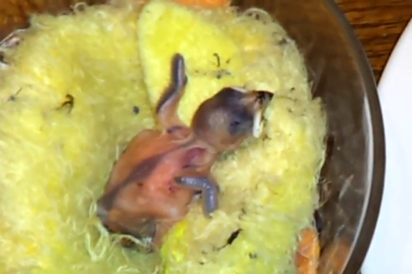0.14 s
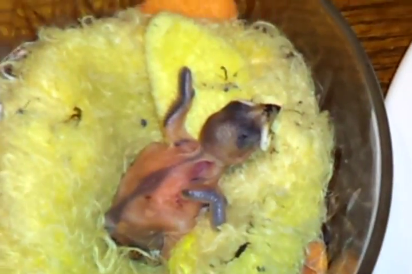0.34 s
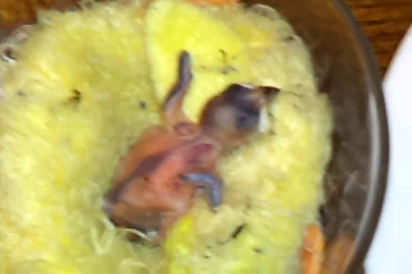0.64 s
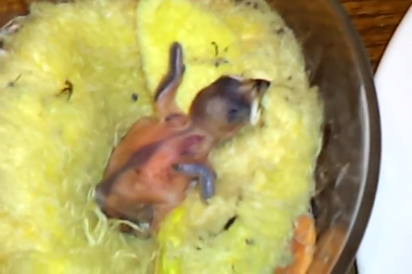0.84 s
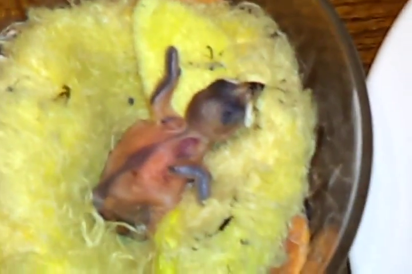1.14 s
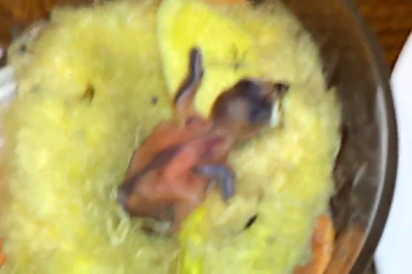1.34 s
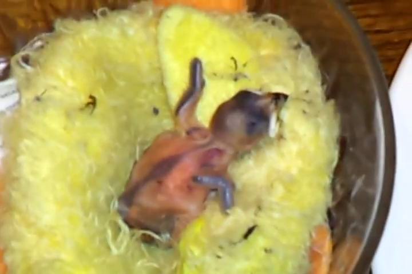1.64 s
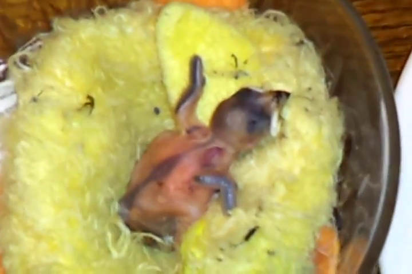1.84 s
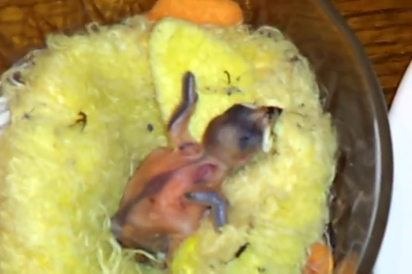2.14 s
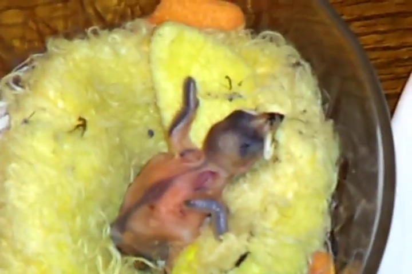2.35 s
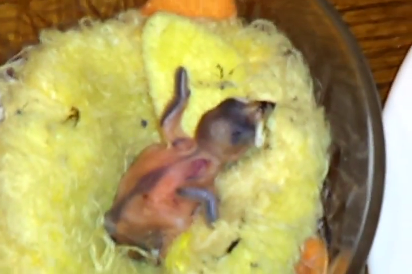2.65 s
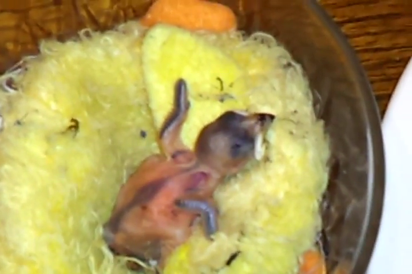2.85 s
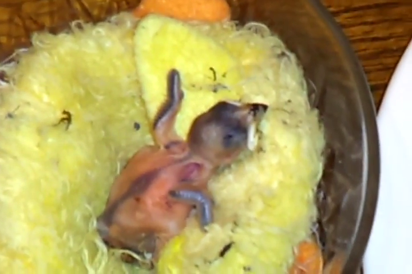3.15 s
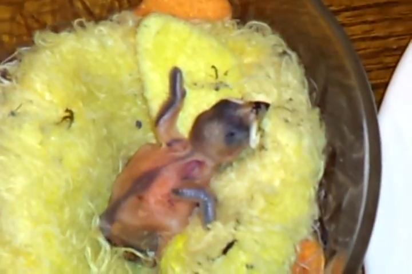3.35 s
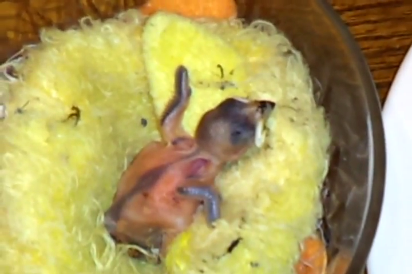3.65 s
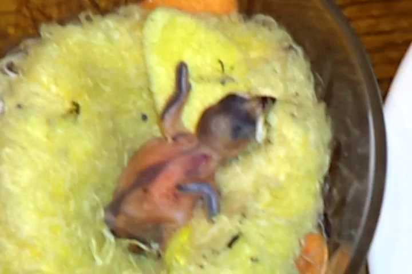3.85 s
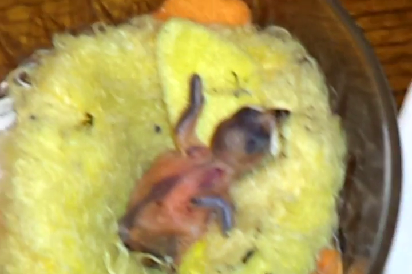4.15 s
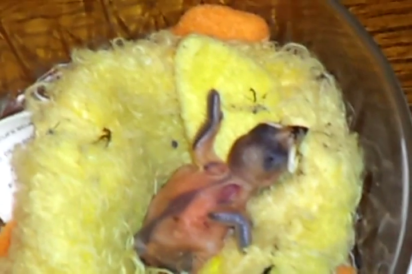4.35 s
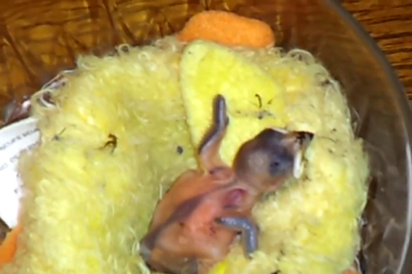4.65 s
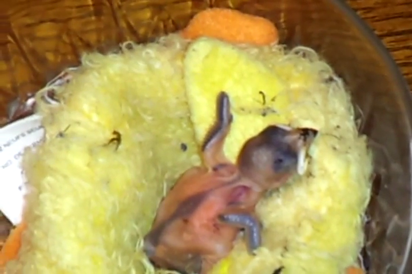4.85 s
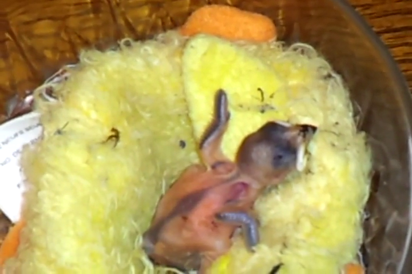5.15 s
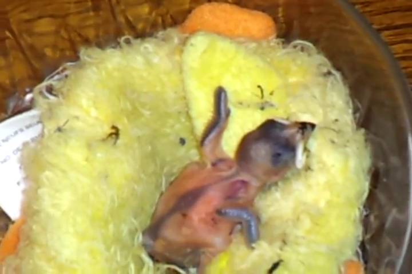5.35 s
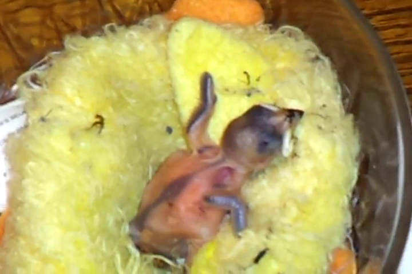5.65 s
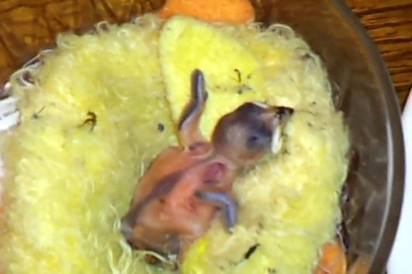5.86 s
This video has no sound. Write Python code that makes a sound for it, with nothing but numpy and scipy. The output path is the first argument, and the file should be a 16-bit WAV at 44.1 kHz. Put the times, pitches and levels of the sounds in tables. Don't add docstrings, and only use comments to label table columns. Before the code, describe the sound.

A quiet room with soft hiss, faint appliance hum and slight cloth brushing, heard through a close, narrow-band microphone. A faint scrape and paper crackle open; at 0.27 and 0.45 s a spoon strikes a ceramic dish very hard, overloading, with table knocks and a quick rebound. Tiny falling squeaks follow at 0.5-0.6 s. Dry ticks and a loud papery snap come at 1.0-1.3 s, then thin peeps around 1.35-1.5 and a muffled tap. A sharp tick marks 2.4 s; hoarse little squeaks sound at 2.65-2.8 among light scrapes and soft table knocks. From 2.9 to 3.75 s taps and scrapes crowd together, strongest at 3.3, 3.5 and 3.7. Squeaks return at 3.9, then it is mostly calm, with a faint tap at 4.4 and weak peeps at 5.0-5.3. A strong muffled blow lands at 5.53; scraping, clinks, rustle and a cup set down rattle at 5.8-6.0.

```python
import sys
import numpy as np
from scipy import signal
from scipy.fft import rfft, irfft, next_fast_len
from scipy.io import wavfile
from scipy.ndimage import uniform_filter1d

SR = 44100
rng = np.random.default_rng(int(sys.argv[2]) if len(sys.argv) > 2 else 0)


def how_loud(loudness_db):
    steps = np.asarray(loudness_db, float) / 20
    return 10 ** steps


def unload_wav(signal):
    wavfile.write(
        sys.argv[1],
        SR,
        np.round(np.clip(np.atleast_2d(signal).T, -1, 1) * 32767).astype(np.int16),
    )


N = 265085

# (frequency [Hz], level [dB], waver [Hz])
MOTOR_LINES = [(42, -43, .3), (112, -71.5, 1.3), (121.4, -48.5, 0.57), (243, -49.5, 7.34),
               (328.6, -52.5, 17), (98, -56.5, 7.63), (788, -59.5, 14)]
# (frequency [Hz], level [dB])
HISS_SPECTRUM = [(40, -41), (60, -14.5), (127, -6), (214, -10.5), (341, -10), (430, -11.5), (850, -16.5),
                 (1600, -18), (2960, -20.5), (4440, -14.5), (5600, -21.5), (6400, -36.5), (7400, -45),
                 (8200, -67.5)]
# (time [s], effort [dB])
CLOTH_EFFORT = [(0, -40.5), (.47, -45), (.7, -42), (1.34, -42.5), (2.3, -47), (3.15, -42), (3.62, -39),
                (3.85, -46), (5.6, -47), (5.84, -43), (6.01, -35)]
# (time [s], length [s], start level [dB], end level [dB], strength of the sheet's resonance [1])
RUSTLES = [
    (0, 0.044, -49, -37, 2),
    (0.086, 0.15, -56, -43.5, 1.6),
    (1.046, 0.024, -32, -44, 1.8),
    (1.2401, 0.018, -10, -5, 0.96),
    (2.493, 0.018, -40.5, -30, 3.5),
    (5.802, 0.12, -29, -33, 1.7),
    (5.918, 0.1, -39.5, -20, 2.8),
]
# (frequency [Hz], level [dB])
PAPER_RESONANCE = [(590, -47.5), (1000, -32), (1730, -31.5), (2800, -12), (4300, -3.5), (5350, -3),
                   (5870, -15), (6890, -10.5), (7500, -20), (9750, -57.5), (16500, -120)]
# (time [s], level [dB], centre [Hz])
DRY_TICKS = [(0.5993, -11, 4200), (0.9148, -24, 4830), (0.9482, -27, 3940), (0.982, -39, 4590),
             (1.075, -7.5, 4130), (1.311, -14, 4430), (1.3244, -26, 5000), (2.232, -18.5, 4170),
             (2.3917, -17, 4680), (2.399, -22, 5500), (2.4048, -0.5, 4340), (2.473, -20, 4840),
             (2.722, -19, 4380), (2.8989, -23, 3410), (3.3283, -14.5, 4270), (3.513, -20, 5040),
             (3.8645, -27, 5580), (4.996, -34, 5300), (5.7586, -36, 4780), (5.7776, -14, 4560),
             (1.075, -19.5, 6040)]
# (time [s], level [dB], centre [Hz], t60 [s])
DECAYING_TICKS = [
    (1.075, -21, 1800, 0.0054),
    (1.3115, -19.5, 2000, .006),
    (1.3112, -20, 2800, .005),
    (1.49, -23, 5900, .006),
    (5.836, -11, 1900, .012),
    (3.3283, -10, 2100, 0.019),
    (3.5124, -7.5, 2380, 0.012),
    (3.5124, -9, 4600, 0.02),
]
# (time [s], length [s], crest after start [s], crest [Hz], effort [dB])
LOW_VOICE = [
    (.503, .045, -.06, 7550, -29),
    (1.35, .15, .035, 6280, -35),
    (2.748, .052, -.003, 6100, -32),
    (3.912, .165, .08, 6190, -33),
    (4.995, .047, -.005, 6080, -35),
    (5.058, .032, 0, 5950, -35),
    (5.083, .093, .057, 5920, -37),
]
# (time [s], length [s], crest after start [s], crest [Hz], effort [dB])
HIGH_VOICE = [
    (.558, .047, -.08, 7150, -36),
    (1.372, .08, .003, 6800, -39),
    (2.65, .09, .055, 6830, -36),
    (2.782, .048, -.06, 7020, -36),
    (3.955, .045, .02, 6750, -40),
    (5.03, .036, .08, 6150, -31),
    (5.045, .112, .065, 6850, -42),
]
# (time [s], length [s], crest after start [s], crest [Hz], effort [dB])
TIRED_NOTES = [
    (.1, .15, .07, 4320, -53),
    (1.316, .066, .02, 6820, -33),
    (3.885, .036, .03, 6520, -35),
    (5.215, .085, .02, 5590, -40),
    (5.285, .04, 0, 5560, -45),
]
# (time [s], length [s], pitch [Hz], level [dB], roughness [0-1])
RASPS = [
    (2.637, .03, 6000, -43, .4),
    (2.673, .014, 6100, -42, .2),
    (2.693, .018, 5950, -35, .1),
    (3.863, .022, 5900, -37, .3),
    (3.864, .036, 5500, -38, .3),
    (3.92, .07, 6000, -47, .3),
    (4.995, .025, 6500, -50, .2),
    (5.06, .04, 5780, -47, .3),
]
# (frequency [Hz], level [dB], t60 [s])
TABLE_MODES = [(226.3, 0.5, 0.46), (330.4, -3, 0.28), (384, 3.5, .1), (553, -8.5, 0.061), (740, -9.5, 0.2),
               (777, -4, 0.032), (960, -5.5, 0.068), (1280, -22, 0.021), (1230, -19.5, 0.12)]
# (time [s], level [dB], hardness [dB])
KNOCKS = [(0.262, -23, 1.5), (0.448, -19, -10), (2.255, -22.5, -17), (2.789, -54, -15), (2.855, -17, -15),
          (3.044, -14.5, -16), (3.298, -25.5, -27), (3.395, -26.5, -9), (3.439, -23.5, -31),
          (5.886, -13.5, -3), (5.909, -18.5, -3)]
# (time [s], level [dB], frequency [Hz])
THUMPS = [
    (0.2661, -16.5, 111),
    (0.4455, -14, 93.6),
    (2.791, -25, 80.6),
    (5.526, -36, 114),
    (5.928, -17.5, 168),
]
# (frequency [Hz], level [dB], t60 [s])
CUP_MODES = [(824, 2, 0.086), (865, 1.5, 0.043), (1100, -11, 0.06), (1517, -5.5, 0.17), (2014, 8, 0.079),
             (2300, -1, 0.041), (2645, 9, 0.058), (3190, -8.5, 0.09), (3580, -8, 0.29), (5002, 2, 0.088)]
# (frequency [Hz], ..)
DISH_HZ = [
    [1493, 1546, 1262, 1640],
    [2476, 2572, 2622, 2972],
    [4030, 4085, 3946, 4506],
    [5206, 5308, 5385, 5620],
    [4870, 6050, 6130, 6958, 7220],
]
# (level [dB], t60 [s])
DISH_RING = [
    [(1, 0.29), (3.5, 0.15), (-17.5, 0.13), (-24.5, 0.029)],
    [(-20, 0.4), (2.5, 0.099), (-14, 0.33), (-3.5, 0.021)],
    [(-14, 0.43), (7, 0.16), (-4.5, 0.03), (-19.5, 0.1)],
    [(-12, 0.05), (3, 0.12), (-3, 0.14), (-18.5, 0.063)],
    [(-15, .06), (0, 0.083), (-13, 0.25), (-8, 0.11), (-6.5, 0.078)],
]
NODE_ORDERS = [2, 3, 4, 5]
# (time [s], length [s], pressure [dB], hardness [dB per octave], place [degrees])
DRAGS = [(0, 0.096, -46.5, -10.5, 30), (.87, 0.16, -50, -10, 28), (1.46, 0.035, -41, 1, 87),
         (2.145, 0.26, -51, -2, 75), (2.585, 0.12, -44, -8, 36), (2.805, 0.1, -44.5, -5, 6.2),
         (2.919, 0.081, -37, -8.5, 32), (3.027, 0.057, -33, 1.5, 82), (3.119, 0.14, -39, 0.5, 85.7),
         (3.41, 0.12, -32.5, -5, 25.4), (5.804, 0.084, -30, 0, 82.5)]
# (time [s], blow [dB], hardness [dB per octave], place round the rim [degrees])
FREE_BLOWS = [
    (0.2658, 0, 1.5, 13.9),
    (0.4493, -1, 3, 85.6),
    (0.4604, -0.5, -7.5, 38.7),
    (0.4894, -17.5, 1, 50),
]
# (time [s], blow [dB], hardness [dB per
HELD_BLOWS = [(0.8812, -29, -4, 85.5), (1.7551, -21.5, 1.5, 20), (2.3275, -26.5, -1, 64.5),
              (2.3499, -27, -1.5, 75), (2.5006, -24, 1, 38), (2.6998, -27, -7, 33), (2.7213, -32, 1, 85.5),
              (2.948, -25, -13, 70), (3.047, -22, 6, 72.0), (3.0774, -21.5, 1, 12), (3.1418, -24, 0.5, 82),
              (3.1565, -21.5, -7, 15), (3.241, -31.5, -9.5, 18), (3.3284, -10.0, -4.5, 36.8),
              (3.4575, -23.0, -14, 36), (3.4845, -24, 20, 60), (3.5122, -6.5, 6, 70),
              (3.613, -12.5, -0.5, 30), (3.7094, -16.5, -1.5, 85.5), (3.7164, -7.5, 6, 24.3),
              (3.7414, -16, -7.5, 29.5), (4.4223, -23, -1, 72),
              (5.504, -24.5, -1, 30),
    (5.5225, -26, 11.5, 87.0),
    (5.5273, -8.5, 11, 87.8),
    (5.797, -26, 18, 85.5),
    (5.803, -13, 7, 5.9),
    (5.833, -12.5, -6.5, 56),
    (5.875, -15, 1.5, 87.0),
]
# (time [s], blow [dB], hardness [dB per octave], place [degrees])
GRIPPED_BLOWS = [
    (1.483, -17, -1.5, 25.9),
    (5.5273, -3.5, -2.5, 27.6),
]


def evened(x):
    return x / np.sqrt(np.mean(x ** 2) + 1e-20)


def add(mix, s, sound):
    part = mix[max(round(s * SR), 0):][:len(sound)]
    part += sound[:len(part)]


def coloured(x, points):
    hz, db = np.transpose(points)
    size = next_fast_len(len(x) + 256)
    log_hz = np.log(np.fft.rfftfreq(size, 1 / SR) + 1)
    gain = how_loud(np.interp(log_hz, np.log(hz), db))
    return irfft(rfft(x, size) * gain, size)[:len(x)]


def ring(modes, damp, scatter_db=0., rise_s=0.):
    t = np.arange(SR // 2) / SR
    tones = np.zeros(len(t))
    for (hz, db, t60), chance in zip(modes, rng.standard_normal(len(modes))):
        tones += how_loud(db + scatter_db * chance - 60 * t / (t60 * damp)) * np.sin(2 * np.pi * hz * t)
    return tones * (1 - np.exp(-t / (rise_s + 1e-5)))


def crack(t60):
    t = np.arange(2000) / SR
    return rng.standard_normal(len(t)) * how_loud(-60 * t / t60)


def room(x):
    spacing, t60 = 22, .36
    at = np.arange(150, SR // 2, spacing)
    at = at + rng.integers(0, spacing, len(at))
    taps = np.zeros(SR)
    taps[at] = rng.choice([-1., 1.], len(at)) * how_loud(-60 * at / SR / t60)
    return signal.fftconvolve(x, taps / np.linalg.norm(taps))[:N]


def hum():
    out = np.zeros(N)
    for hz, db, waver_hz in MOTOR_LINES:
        drift = evened(uniform_filter1d(uniform_filter1d(rng.standard_normal(N), 2000), 2000))
        cycles = np.cumsum(hz + waver_hz * drift) / SR + rng.random()
        out += np.sqrt(2) * how_loud(db) * np.sin(2 * np.pi * cycles)
    return out


def cloth():
    s, effort_db = np.transpose(CLOTH_EFFORT)
    fizz_db = -62.5 + 0.66 * (effort_db - np.mean(effort_db))
    out = np.zeros(N)
    for db, band_hz in [(effort_db - 5, (900, 2460)), (fizz_db - 4, (5900, 6600))]:
        band = signal.butter(2, band_hz, "band", fs=SR)
        noise = evened(signal.lfilter(*band, rng.standard_normal(N)))
        out += noise * how_loud(np.interp(np.arange(N) / SR, s, db))
    return out


def hiss():
    swell = evened(uniform_filter1d(rng.standard_normal(N), 5000))
    return how_loud(-40 + .5 * swell) * evened(coloured(rng.standard_normal(N), HISS_SPECTRUM))


def rustles():
    out = np.zeros(N)
    for s, length, start_db, end_db, focus in RUSTLES:
        count = round(length * SR)
        unevenness = uniform_filter1d(rng.standard_normal(count), 30)
        snaps = rng.standard_normal(count) * how_loud(3.22 * unevenness)
        paper = evened(coloured(snaps, np.multiply(PAPER_RESONANCE, [1, focus])))
        envelope = how_loud(np.linspace(start_db, end_db, count)) * signal.windows.tukey(count, .08)
        add(out, s, paper * envelope)
    return out


def ticks():
    out = np.zeros(N)
    for s, db, hz, t60 in [(*tick, 0.009) for tick in DRY_TICKS] + DECAYING_TICKS:
        snap = 0.22 * crack(t60 + 0.0025) + signal.unit_impulse(2000)
        band = signal.butter(2, [hz * 0.81, min(hz * 1.27, 9000)], "band", fs=SR)
        add(out, s, how_loud(db + 13.5) * signal.lfilter(*band, signal.lfilter(*band, snap)))
    return out


def nestling():
    knee_s, climb = .035, .4
    rise_s, fade_s = .008, .007
    beak_hz, beak_db_per_khz = 5600, -15
    out = np.zeros(N)
    for notes, sag in [(LOW_VOICE, 19000), (HIGH_VOICE, 24000), (TIRED_NOTES, 3500)]:
        for s, length, crest_s, crest_hz, db in notes:
            t = np.arange(0, length, 1 / SR)
            tremble, flutter = (evened(uniform_filter1d(v, 150)) for v in rng.standard_normal((2, len(t))))
            climbing = t < crest_s
            slope = sag * np.where(climbing, climb, 1)
            glide = crest_hz - slope * (np.hypot(t - crest_s, knee_s) - knee_s)
            shake = .004 * tremble * np.where(climbing, 2.5, 1)
            tone = np.sin(2 * np.pi * np.cumsum(glide * (1 + shake)) / SR)
            edges = np.minimum(1, np.minimum(t / rise_s, (length - t) / fade_s))
            beak_db = beak_db_per_khz * np.maximum(glide - beak_hz, 0) / 1000
            climb_db = -4 * np.clip((crest_s - t) / knee_s, 0, 1)
            add(out, s, np.sqrt(2) * how_loud(db + beak_db + climb_db + 0.78 * flutter) * edges * tone)
    return out


def rasps():
    out = np.zeros(N)
    for s, length, hz, db, rough in RASPS:
        count = round(length * SR)
        jitter, bursts = (evened(uniform_filter1d(v, 90)) for v in rng.standard_normal((2, count)))
        tone = np.sin(2 * np.pi * np.cumsum(hz * (1 + .08 * rough * jitter)) / SR)
        add(out, s, how_loud(db + 11 * rough * bursts) * tone * signal.windows.tukey(count, .4))
    return out


def table():
    out = np.zeros(N)
    blur_band = signal.butter(2, [250, 650], "band", fs=SR)
    for s, db, hard_db in KNOCKS:
        bass = ring(TABLE_MODES[:3], 0.97, 1.5, rise_s=0.011)
        upper = ring(TABLE_MODES[3:], 0.8, 1.5, rise_s=0.0015)
        add(out, s, how_loud(db - 10.5) * (bass + how_loud(hard_db + 14.5) * upper))
        add(out, s, how_loud(db) * signal.lfilter(*blur_band, crack(0.21)))
    for s, db, hz in THUMPS:
        add(out, s, how_loud(db) * ring([(hz, 0, .09)], 0.51, rise_s=0.0029))
    return out


def cup():
    out = np.zeros(N)
    landing_s, db = 5.8868, -18
    add(out, .4497, how_loud(-11.5) * ring(CUP_MODES[9:], 1.3))
    add(out, landing_s, how_loud(db) * ring(CUP_MODES, 0.79, rise_s=0.00097))
    add(out, landing_s, how_loud(-7) * uniform_filter1d(crack(0.0095), size=6))
    add(out, landing_s + .019, how_loud(db - 2.5) * ring(CUP_MODES[:4], 0.62))
    return out


def dish():
    return [[(hz, *r) for hz, r in zip(*family)] for family in zip(DISH_HZ, DISH_RING)]


def families_db(hard_db, place):
    octaves = np.log2([family[0] / 3000 for family in DISH_HZ[:4]])
    node_leak = 0.0049
    coupling = np.cos(np.radians(place) * np.array(NODE_ORDERS)) ** 2 + node_leak
    return list(hard_db * octaves + 10 * np.log10(coupling))


def drags():
    slips_per_s = 900
    out = np.zeros(N)
    for s, length, db, hard_db, place in DRAGS:
        count = round(length * SR)
        pressure_db = db + np.interp(np.linspace(0, 1, count), [0, 0.37, 1], [-7, 0, -7])
        slips = rng.standard_normal(count) * (rng.random(count) < slips_per_s / SR) * how_loud(pressure_db)
        for family_db, modes in zip(families_db(hard_db, place), dish()):
            body = ring(modes, 0.22, rise_s=0.0012)[:6000]
            scrape = signal.fftconvolve(slips * how_loud(family_db), body / np.linalg.norm(body))
            add(out, s, scrape * np.sqrt(SR / slips_per_s))
    return out


def strikes(rows, damp, lift_db, top_db, crack_db, crack_s, rise_s):
    out = np.zeros(N)
    snap_band = signal.butter(3, [1600, 5600], "band", fs=SR)
    for s, db, hard_db, place in rows:
        shares_db = families_db(hard_db, place)
        shares_db.append(shares_db[-1] + top_db)
        for share_db, modes in zip(shares_db, dish()):
            add(out, s, how_loud(db - 9 + share_db + lift_db) * ring(modes, damp, 1, rise_s))
        add(out, s, how_loud(1.6 * db + crack_db) * signal.lfilter(*snap_band, crack(crack_s)))
    return out


def scene():
    near = table() + cup() + nestling() + rasps() + drags()
    near += strikes(FREE_BLOWS, 0.64, lift_db=4.5, top_db=1.5, crack_db=0, crack_s=0.022, rise_s=0.0001)
    near += strikes(HELD_BLOWS, 0.4, lift_db=0.5, top_db=-21, crack_db=-5.5, crack_s=0.041,
                    rise_s=0.002)
    near += strikes(GRIPPED_BLOWS, 0.096, lift_db=11, top_db=-10.5, crack_db=-25, crack_s=0.0046, rise_s=0.0022)
    snaps = ticks() + rustles()
    background = hum() + cloth() + hiss()
    return (near + snaps + how_loud(-12.5) * room(near) + how_loud(-48.5) * room(snaps) + background)[None]


def roll_off(x):
    return signal.sosfilt(signal.butter(12, 7650, fs=SR, output="sos"), x)


def record(dry):
    edge_hz = 7395
    lowpass = signal.firwin(201, edge_hz, window=("kaiser", 8), fs=SR)
    narrow = signal.oaconvolve(dry, lowpass[None], "same")
    return roll_off(np.clip(narrow, -1, 1))


dry = scene()
out = record(dry)
unload_wav(out)
```